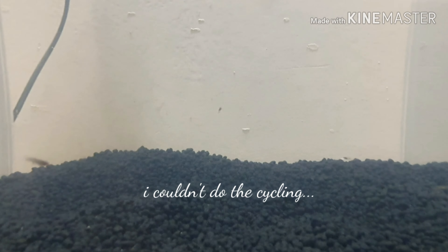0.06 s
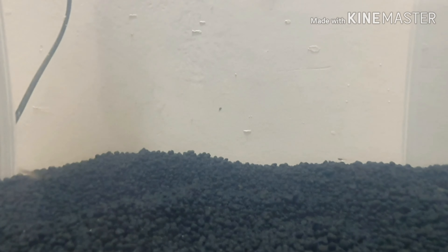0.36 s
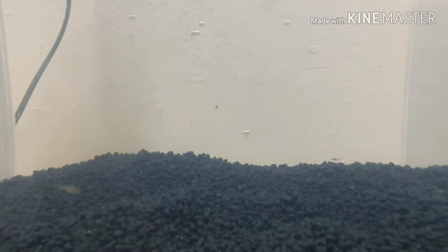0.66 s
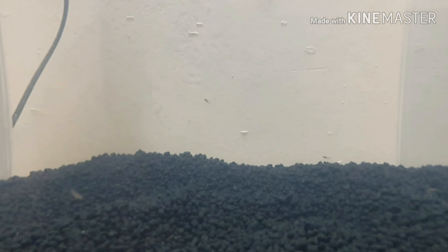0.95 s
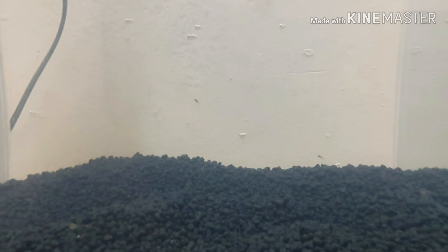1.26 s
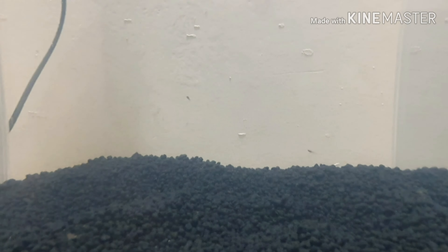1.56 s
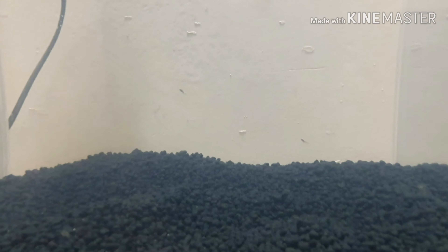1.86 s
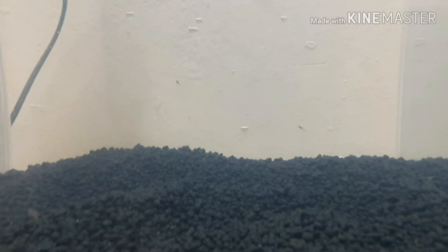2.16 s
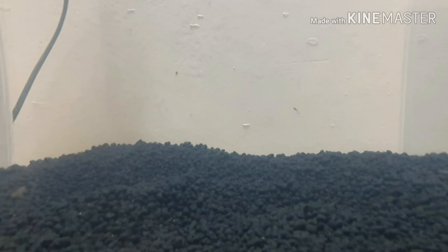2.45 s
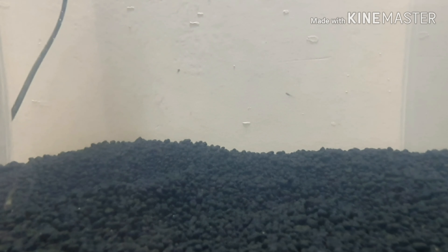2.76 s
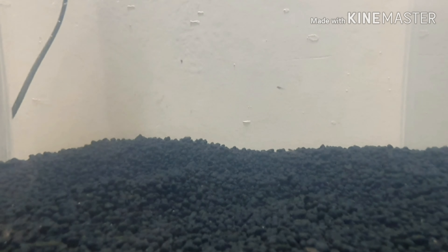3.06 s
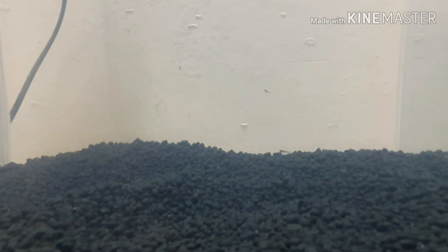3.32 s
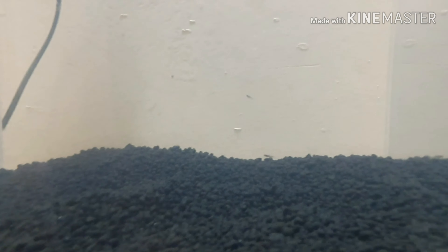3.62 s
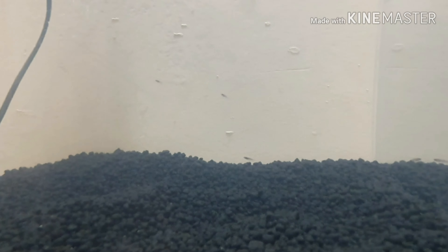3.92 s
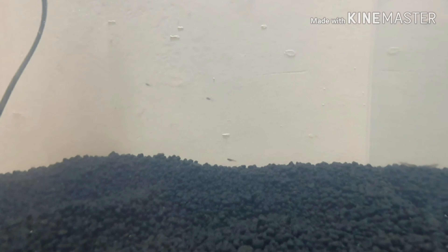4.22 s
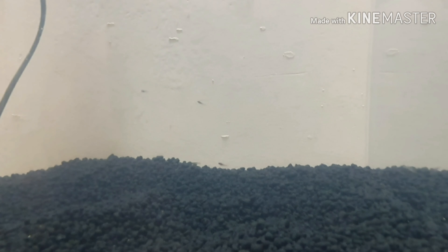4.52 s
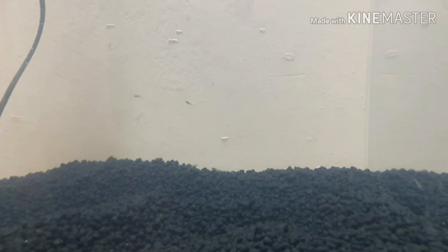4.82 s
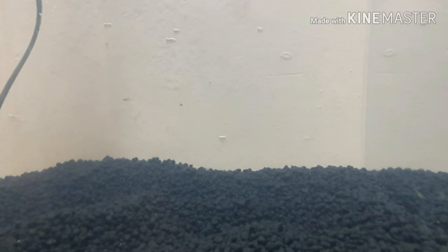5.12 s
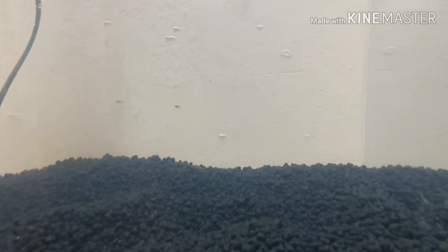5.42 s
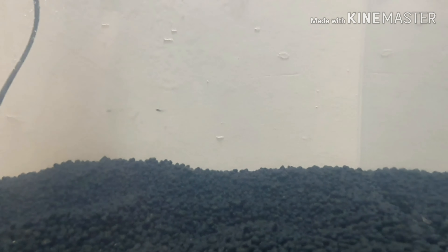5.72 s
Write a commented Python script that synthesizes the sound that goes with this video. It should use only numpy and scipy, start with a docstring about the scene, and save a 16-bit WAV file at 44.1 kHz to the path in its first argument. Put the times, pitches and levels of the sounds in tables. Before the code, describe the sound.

Water from a filter trickles into a small aquarium, heard close up for about six seconds. From the very start, tiny air bubbles give short, high plinks and ticks at irregular intervals, many each second, each ringing only for an instant. Behind them lies a softer bed of smaller plinks, fizz and fine spits that swells and eases in little spurts. The distinct plinks are busiest and brightest from about 1 to 3.5 seconds, then become sparser after about 4.3 seconds, though the trickle never stops. Underneath the whole time, the electric pump makes a low, steady hum with a slight waver, blended with the dull rush of a small room. That low rumble eases a little in the last second or two. The water has only a faint, short room echo.

```python
"""A small aquarium, close up. The filter outflow trickles into the water and traps tiny air bubbles.
Each one pings for a few milliseconds, sagging in pitch, coloured by the resonances of the tank.
Distinct plinks stand out of a bed of lesser plinks, fizz and treble spits, with a faint room tail.
Underneath, the mains-driven pump hums over the dull rush of a small room."""
import sys
import numpy as np
from scipy import signal
from scipy.fft import rfft, irfft
from scipy.io import wavfile

SR = 44100
rng = np.random.default_rng(int(sys.argv[2]) if len(sys.argv) > 2 else 0)


def store_wav(level_fs):
    """Save 16-bit WAV to argv[1]."""
    pcm = np.round(np.clip(np.atleast_2d(level_fs), -1, 1) * 32767)
    wavfile.write(sys.argv[1], SR, pcm.T.astype(np.int16))


N = 254898
TIME = np.arange(N) / SR

# tone curve of the room's rush: freq_hz, gain_db
RUSH_COLOUR = [(25, -14), (55, 3), (80, -2.5), (125, -1), (170, 2.5), (250, -3), (450, -6.5), (700, -12.5),
               (1050, -11), (1400, -12.5), (2000, -11.5), (2550, -24), (6500, -29), (9000, -36.5),
               (15000, -38)]
# hollow resonances of the pump housing and stand: centre_hz, width_hz, boost_db
HOUSING_MODES = [(155, 5.2, 4.5), (219.5, 55, 4.5), (280.6, 7.7, 8.5), (343.6, 3.6, 2.5), (371, 9.8, 6.5),
                 (1054, 52, 5.5)]
# fader on the rumble, slowly easing: time_s, gain_db
RUMBLE_FADER = [(0, 3), (.4, -3), (.9, 1), (3.9, 0.2), (4.9, -2), (5.78, -4.5)]
# swell of the pump's lowest tone: time_s, rms_db
PUMP_THROB = [(0.0, -62.5), (1.36, -49), (2.34, -66.6), (3.05, -57.7), (3.31, -67.5), (4.55, -57.5),
              (4.74, -80), (5.07, -59), (5.78, -58)]
# overtones of the pump: mains_multiple, rms_db
PUMP_OVERTONES = [(2, -55.5), (3, -65.5), (4, -63), (7, -70), (8, -72.5), (11, -72)]
# resonances of the water-filled tank: centre_hz, width_hz, gain_db
TANK_MODES = [(2249, 67, 11.5), (2815, 257, 2.5), (3695, 320, 1.5), (4505, 465, 1.5), (4930, 103, -3),
              (5730, 110, -3.5), (6700, 733, 6.5), (8180, 49, -5), (9640, 300, -10), (12630, 1540, -7.5),
              (15170, 420, -5.5)]
# strength of the trickle, a fader on lesser plinks and fizz: time_s, gain_db
FLOW_FADER = [(0.0, -55.5), (0.26, -52.5), (0.52, -50), (0.71, -60), (1.43, -51.5), (1.82, -58),
              (2.08, -53.9), (2.4, -60), (2.92, -54), (3.05, -61.5), (3.31, -50.5), (3.44, -70),
              (3.57, -50), (4.09, -60), (4.48, -53.5), (4.94, -58), (5.39, -56.5), (5.78, -60.5)]
# fader on the tiniest bubbles, up in the treble: time_s, gain_db
SPIT_FADER = [(0.0, -62), (0.26, -75), (0.32, -72), (0.65, -65.5), (1.3, -54), (1.43, -62), (1.75, -74.5),
              (2.01, -52.5), (2.27, -63), (2.66, -62.2), (2.86, -70), (3.12, -53.5), (3.25, -76),
              (3.57, -63), (4.48, -62.6), (4.61, -76.5), (5.26, -56), (5.78, -79)]
# the foreground bubbles: start_s, level_db, pitch_hz, t60_s
LEAD_BUBBLES = [(0.0144, -28, 6050, 0.0016), (0.0928, -29, 5970, 0.0072), (0.1146, -44, 2380, 0.042),
                (0.1342, -33.5, 4200, 0.0018), (0.1647, -40, 2730, 0.0071), (0.2884, -33.5, 4000, 0.011),
                (0.3178, -34.5, 8700, 0.011), (0.389, -35, 2140, 0.0072), (0.4314, -36.5, 4450, 0.0067),
                (0.48, -32, 5800, 0.023), (0.5553, -35.5, 5670, 0.017), (0.5929, -32, 4900, 0.007),
                (0.6324, -30.5, 4480, 0.01), (0.6572, -31.5, 5700, 0.0054), (0.687, -30, 6300, 0.012),
                (0.7131, -30.5, 6360, 0.0075), (0.7309, -33.5, 3460, 0.025), (0.9516, -23.5, 5490, 0.003),
                (0.967, -20.5, 4000, 0.0063), (0.9753, -35, 8650, 0.0029), (0.9997, -34.5, 4350, 0.005),
                (1.0384, -30.5, 3600, 0.018), (1.128, -31.5, 5150, 0.008), (1.1999, -26, 5300, 0.004),
                (1.2851, -29, 5000, 0.0087), (1.2915, -27, 9300, 0.0013), (1.3422, -29.5, 5900, 0.006),
                (1.355, -29.5, 4600, 0.015), (1.469, -25.5, 4870, 0.0035), (1.488, -37.5, 2490, 0.035),
                (1.4978, -29.5, 6260, 0.0081), (1.5732, -31, 4360, 0.0057), (1.7532, -28.5, 3240, 0.0027),
                (1.7618, -32, 2650, 0.002), (1.7657, -31, 4610, 0.011), (1.8348, -43.5, 2550, 0.025),
                (1.8807, -30, 6430, 0.0094), (1.8957, -34, 3670, 0.0098), (1.9425, -37.5, 8850, 0.006),
                (1.9819, -24, 5230, 0.0055), (1.9963, -27, 5400, 0.0035), (2.0054, -37.5, 2020, 0.011),
                (2.0207, -29, 5230, 0.0045), (2.0382, -33, 5030, 0.006), (2.1878, -27, 3590, 0.0072),
                (2.2207, -26, 6040, 0.011), (2.244, -39, 4830, 0.0038), (2.2568, -23.5, 5660, 0.007),
                (2.2583, -38.5, 2820, 0.012), (2.2942, -31.5, 4230, 0.0043), (2.3457, -27, 6100, 0.0054),
                (2.3608, -29, 8470, 0.009), (2.3711, -36.5, 2710, 0.023), (2.3902, -35.5, 3360, 0.021),
                (2.4762, -26, 5130, 0.0049), (2.5014, -22.5, 4120, 0.0053), (2.521, -30, 5670, 0.003),
                (2.559, -33.5, 4400, 0.0088), (2.6231, -27.5, 4220, 0.0052), (2.641, -29, 5400, 0.003),
                (2.696, -33, 5300, 0.01), (2.7214, -28, 5600, 0.0061), (2.8063, -26.5, 3780, 0.009),
                (2.8537, -36, 3350, 0.012), (2.8685, -33.5, 5900, 0.011), (2.8853, -27, 4390, 0.01),
                (2.9054, -33, 5800, 0.008), (2.9308, -30.5, 6200, 0.0092), (2.9383, -27.5, 4950, 0.0039),
                (2.9992, -31, 4050, 0.005), (3.0077, -25.5, 5700, 0.0098), (3.0951, -36.5, 5300, 0.018),
                (3.122, -28.5, 4660, 0.0018), (3.187, -28, 5000, 0.007), (3.316, -25, 3810, 0.0067),
                (3.3361, -33.5, 4030, 0.005), (3.4828, -27, 4100, 0.0032), (3.5042, -34.5, 4000, 0.011),
                (3.5385, -28, 3860, 0.003), (3.57, -28.5, 3400, 0.01), (3.73, -42.5, 2700, 0.012),
                (3.802, -35, 4470, 0.0089), (3.813, -33, 3460, 0.0086), (3.8631, -29, 3480, 0.0085),
                (3.8993, -31.5, 4550, 0.008), (3.9402, -32, 4430, 0.0034), (3.9442, -29.5, 4420, 0.006),
                (4.0028, -24, 5700, 0.0022), (4.091, -31.5, 4830, 0.011), (4.187, -27.5, 8400, 0.0016),
                (4.2465, -38.5, 2540, 0.018), (4.281, -24.5, 3980, 0.0079), (4.2887, -33.5, 3030, 0.0023),
                (4.4413, -32, 6200, 0.0038), (4.617, -31.5, 4030, 0.0042), (4.8688, -29, 7500, 0.00087),
                (4.917, -35.5, 5200, 0.006), (4.945, -36.5, 2660, 0.024), (5.1934, -30, 4000, 0.0098),
                (5.2316, -32, 4850, 0.025), (5.3397, -43, 2750, 0.017), (5.3858, -30, 4020, 0.0052),
                (5.4013, -33.5, 6500, 0.0044), (5.449, -28.5, 5610, 0.0057), (5.635, -35, 4140, 0.046)]

MAINS_HZ = 50.1
# a typical bubble; snap is the weight of its film's click against its ring
TYPICAL_HZ, TYPICAL_T60_S, TYPICAL_SNAP = 5000, 0.0067, 1.25
# exponents: small bubbles die sooner and snap harder; long rings start softly next to their snap
SHORTER_WITH_PITCH, SNAP_WITH_PITCH, SNAP_WITH_RING = 0.6, 0.95, 0.43


def gain_of(db):
    """Decibels to amplitude."""
    return 10 ** (np.asarray(db) / 20)


def follow(curve):
    """Draws an automation line through (time_s, value) rows at every sample."""
    return np.interp(TIME, *np.transpose(curve))


def add(mix, start_s, sound):
    """Drops a sound into the mix at its cue."""
    part = mix[max(round(start_s * SR), 0):][:len(sound)]
    part += sound[:len(part)]


def drift(rate_hz):
    """A smooth random modulator of rms 1."""
    hz = np.fft.rfftfreq(N, 1 / SR)
    wander = irfft(rfft(rng.standard_normal(N)) * np.exp(-(hz / rate_hz) ** 2), N)
    return wander / np.sqrt(np.mean(wander ** 2))


def room_rush(midrange_db=-57.38, split_hz=480):
    """Dull noise coloured by the hollow pump housing: a shifting rumble under steady air."""
    hz = np.fft.rfftfreq(N, 1 / SR)
    points_hz, points_db = np.transpose(RUSH_COLOUR)
    colour_db = np.interp(np.log(hz + 1), np.log(points_hz), points_db)
    for centre_hz, width_hz, boost_db in HOUSING_MODES:
        colour_db += boost_db / (1 + (2 * (hz - centre_hz) / width_hz) ** 2)
    spectrum = rfft(rng.standard_normal(N)) * gain_of(colour_db)
    midrange = irfft(spectrum * ((hz > 230) & (hz < 2000)), N)
    rumble = irfft(spectrum * (hz < split_hz), N) * gain_of(follow(RUMBLE_FADER))
    air = irfft(spectrum * (hz >= split_hz), N)
    return (rumble + air) / midrange.std() * gain_of(midrange_db)


def pump_hum(waver_db=0.5, wobble_cycles=0.049):
    """The pump vibrates at the mains frequency and its overtones, each wavering a little."""
    hum = np.zeros(N)
    for multiple, db in [(1, follow(PUMP_THROB))] + PUMP_OVERTONES:
        cycles = multiple * MAINS_HZ * TIME + rng.random() + wobble_cycles * drift(0.78)
        hum += np.sqrt(2) * gain_of(db + waver_db * drift(5.6)) * np.sin(2 * np.pi * cycles)
    return hum


def room_tail(sound, wet_db=-21, t60_s=0.6, gap_s=0.0017, size=16000):
    """A faint, short reverb from the walls of the room."""
    t = np.arange(size) / SR
    tail = rng.standard_normal(size) * gain_of(-60 * t / t60_s) * (t > gap_s)
    return gain_of(wet_db) * signal.fftconvolve(sound, tail / np.linalg.norm(tail))[:N]


def filtered_tank_modes(notch_hz=8900, notch_q=20, top_hz=13500, size=700):
    """Damped tank modes of alternating polarity, then a tone filter: a treble notch and a softened top."""
    t = np.arange(size) / SR
    modes = np.zeros(size)
    for k, (hz, width_hz, db) in enumerate(TANK_MODES):
        envelope = gain_of(db) * width_hz * np.exp(-np.pi * width_hz * t)
        modes += (-1) ** k * envelope * np.cos(2 * np.pi * hz * t)
    notched = signal.lfilter(*signal.iirnotch(notch_hz, notch_q, SR), modes)
    return signal.sosfilt(signal.butter(4, top_hz, fs=SR, output="sos"), notched)


def glass_echoes(sound, echo_db=-14, first_s=0.001232, spread_s=0.0031, count=14, size=1100):
    """The glass walls add a few quick echoes, different for every spot on the surface."""
    delays_s = first_s + rng.exponential(spread_s, count)
    slots = np.minimum(delays_s * SR, size - 1).astype(int)
    taps = np.zeros(size)
    taps[slots] = gain_of(echo_db) * rng.choice([-1, 1], count) / np.sqrt(count)
    taps[0] = 1
    return signal.fftconvolve(sound, taps)


def ping(tank, hz, t60_s, snap, sag=0.19, sag_s=0.0016, spray_s=0.0026, rise_cycles=0.28, size=1400):
    """A snap, then a dying tone that sinks as the bubble is carried under; through the tank, peak 1."""
    t = np.arange(size) / SR
    cycles = np.cumsum(hz * (1 + sag * np.exp(-t / sag_s))) / SR
    attack = 1 - np.exp(-t * hz / rise_cycles)
    ring = np.sin(2 * np.pi * cycles) * attack * gain_of(-60 * t / t60_s)
    # the snap: a quick puff of spray and one sharp click, equal in energy
    burst = rng.standard_normal(size) * np.exp(-t / spray_s)
    burst /= np.linalg.norm(burst)
    burst[0] += 1
    # a bubble radiates poorly below its own pitch
    low_cut = signal.butter(3, min(0.99 * hz, SR / 4), "highpass", fs=SR, output="sos")
    radiated = signal.sosfilt(low_cut, ring + snap * burst)
    heard = signal.fftconvolve(radiated, tank)[:size]
    return heard / abs(heard).max()


def bubble(tank, hz, t60_s, snappy=1, snap_spread_db=1.5):
    """One ping with its echoes; the snap follows pitch and ring time, give or take a little."""
    snap = snappy * TYPICAL_SNAP * (hz / TYPICAL_HZ) ** SNAP_WITH_PITCH
    snap *= (t60_s / TYPICAL_T60_S) ** SNAP_WITH_RING
    snap *= gain_of(snap_spread_db * rng.standard_normal())
    return glass_echoes(ping(tank, hz, t60_s, snap))


def swarm(tank, per_s, brood, lag_s, band_hz, range_db, snappy, tilt, ring_spread=0.71, count=64):
    """Random bubbles, plus a brood in the wake of each lead one; positive tilt lifts the small ones."""
    pitches_hz = np.geomspace(*band_hz, count)
    rings_s = TYPICAL_T60_S * (TYPICAL_HZ / pitches_hz) ** SHORTER_WITH_PITCH
    rings_s *= np.exp(ring_spread * rng.standard_normal(count))
    palette = [(hz / TYPICAL_HZ) ** tilt * bubble(tank, hz, t60_s, snappy)
               for hz, t60_s in zip(pitches_hz, rings_s)]
    lead_samples = (np.array(LEAD_BUBBLES)[:, 0] * SR).astype(int)
    triggers = np.bincount(lead_samples, minlength=N)[:N]
    wake_per_s = signal.lfilter([1], [1, -np.exp(-1 / (lag_s * SR))], triggers) * brood / lag_s
    born = rng.random(N) < (per_s + wake_per_s) / SR
    gains = gain_of(-range_db * rng.random(N))
    picks = rng.integers(0, count, N)
    mix = np.zeros(N)
    for at in np.flatnonzero(born):
        add(mix, at / SR, gains[at] * palette[picks[at]])
    return mix


def trickle(tank, plinks_db=21.5, fizz_db=11.5, spits_db=25, spurt_hz=12, spurt_db=2):
    """The bed: lesser plinks, the fizz of bursting films, and the tiniest bubbles spitting on top."""
    spurts = gain_of(spurt_db * drift(spurt_hz))  # water falls in spurts, swinging the birth rate
    plinks = swarm(tank, per_s=21 * spurts, brood=0.15, lag_s=0.014,
                   band_hz=(3516, 7260), range_db=10, snappy=1, tilt=0.28)
    fizz = swarm(tank, per_s=110 * spurts, brood=1.9, lag_s=0.007,
                 band_hz=(2307, 7000), range_db=17.5, snappy=2.9, tilt=0.1)
    spits = swarm(tank, per_s=55 * spurts, brood=0.3, lag_s=0.008,
                  band_hz=(7430, 12360), range_db=15, snappy=1.05, tilt=-0.1)
    body = gain_of(follow(FLOW_FADER)) * (gain_of(plinks_db) * plinks + gain_of(fizz_db) * fizz)
    return body + gain_of(follow(SPIT_FADER) + spits_db) * spits


def lead_plinks(tank):
    """The foreground: trapped air bubbles ringing out distinctly, each on its cue."""
    mix = np.zeros(N)
    for start_s, level_db, pitch_hz, t60_s in LEAD_BUBBLES:
        add(mix, start_s, gain_of(level_db) * bubble(tank, pitch_hz, t60_s))
    return mix


def scene():
    """The mono mix: water over pump and rush, with only the water sent to the reverb."""
    tank = filtered_tank_modes()
    water = lead_plinks(tank) + trickle(tank)
    return (water + pump_hum() + room_rush() + room_tail(water))[None]


def record(dry):
    """A steep low-pass trims the very top of the mix."""
    low_pass = signal.firwin(301, 15800, window=("kaiser", 8), fs=SR)
    return signal.oaconvolve(dry, low_pass[None], "same")


dry = scene()
out = record(dry)
store_wav(out)
```